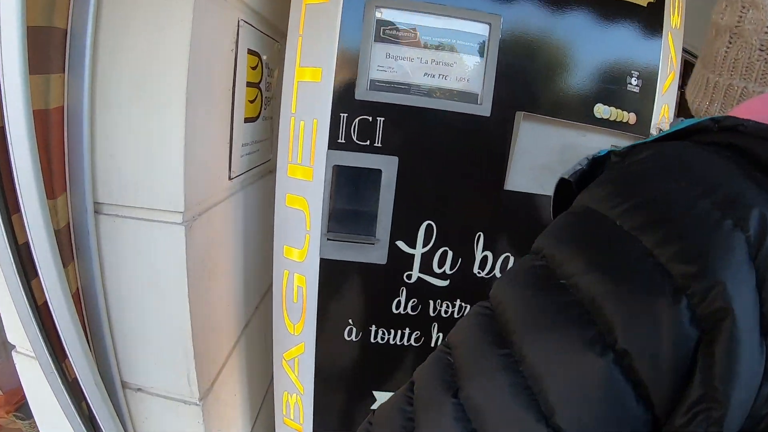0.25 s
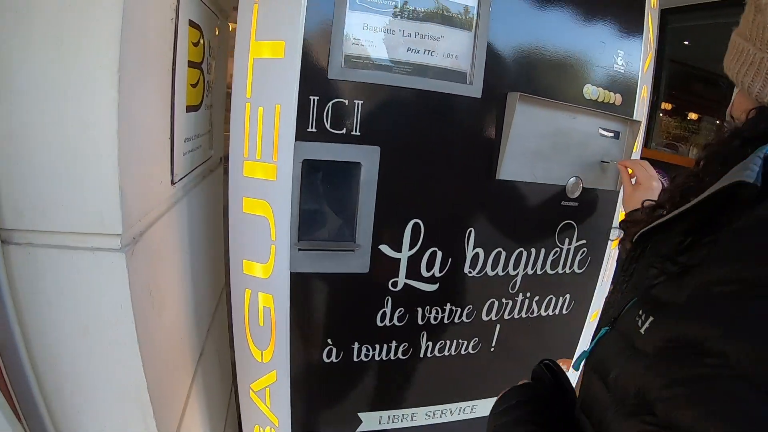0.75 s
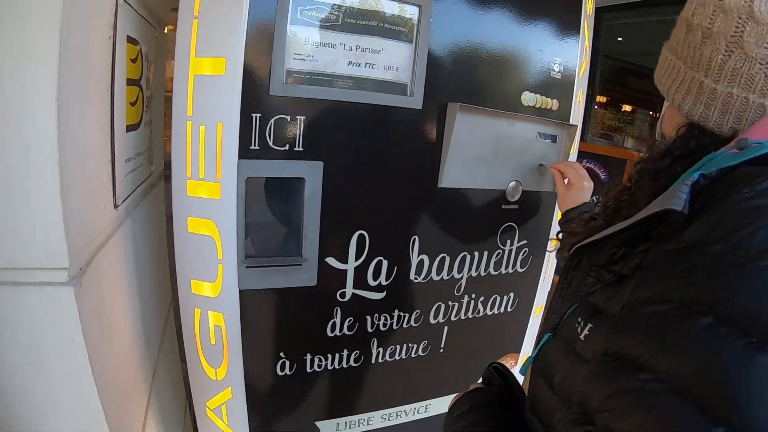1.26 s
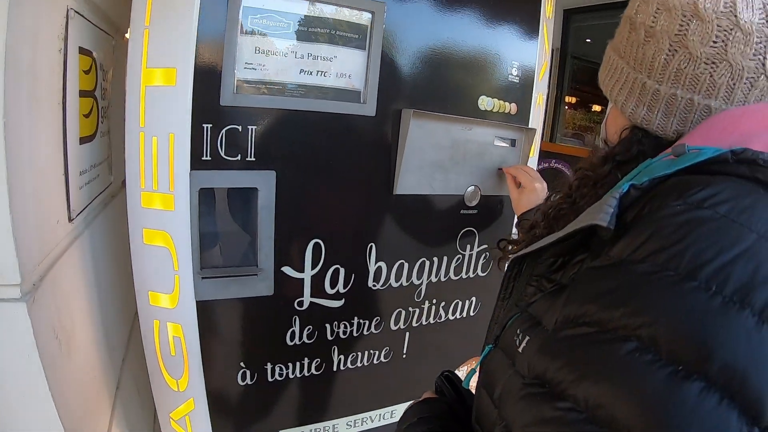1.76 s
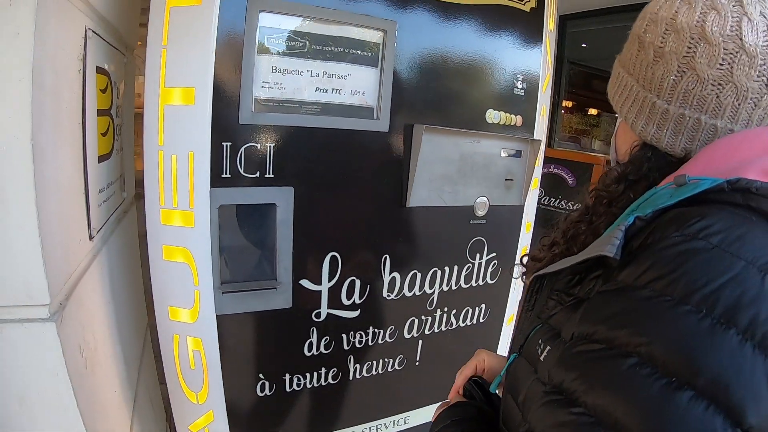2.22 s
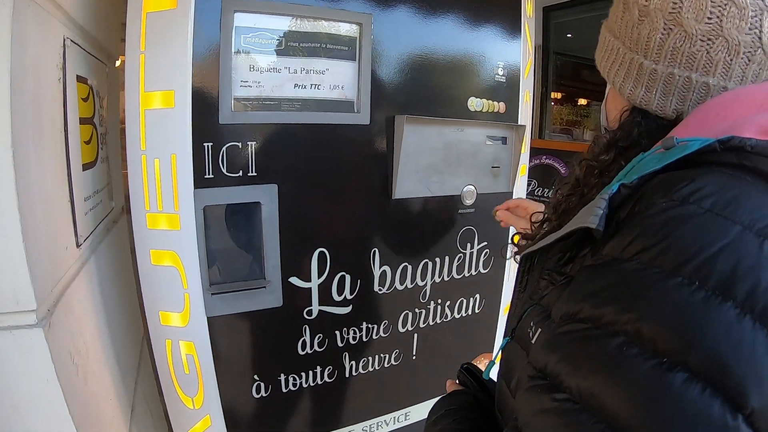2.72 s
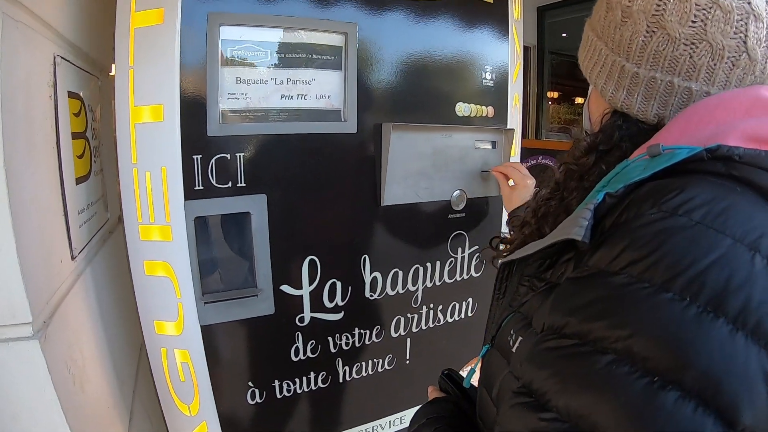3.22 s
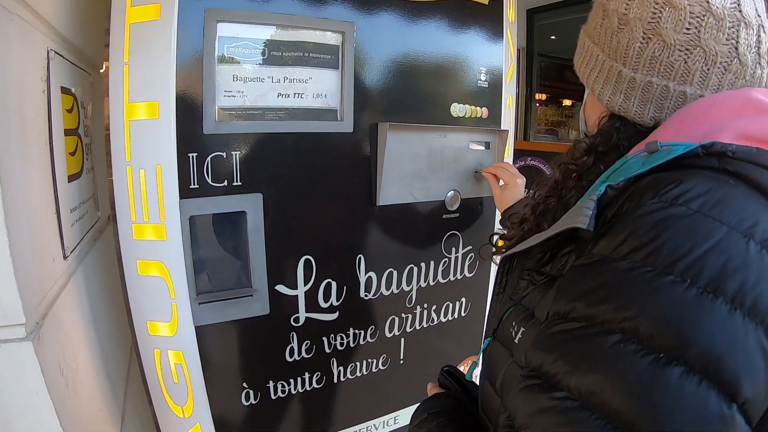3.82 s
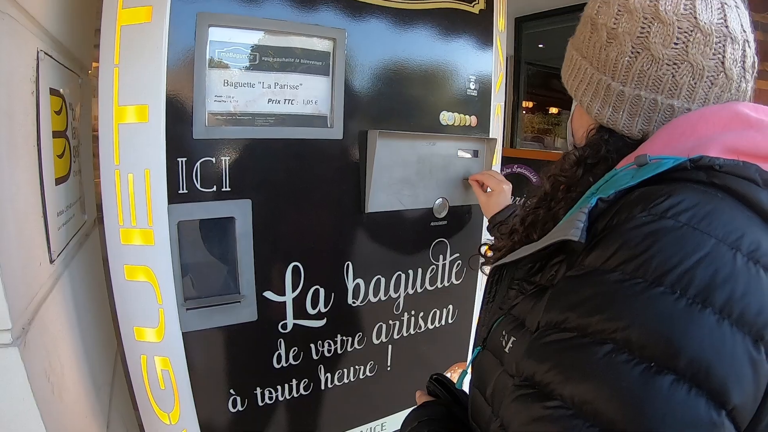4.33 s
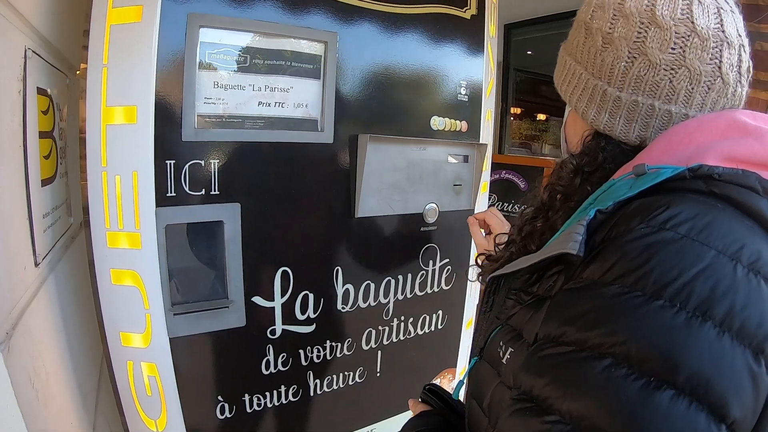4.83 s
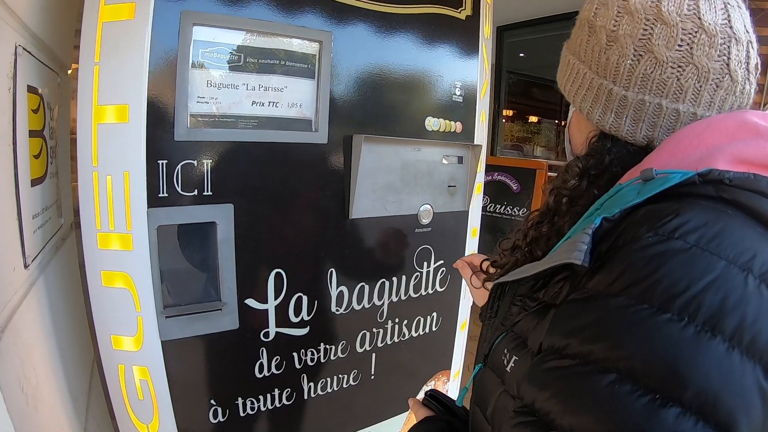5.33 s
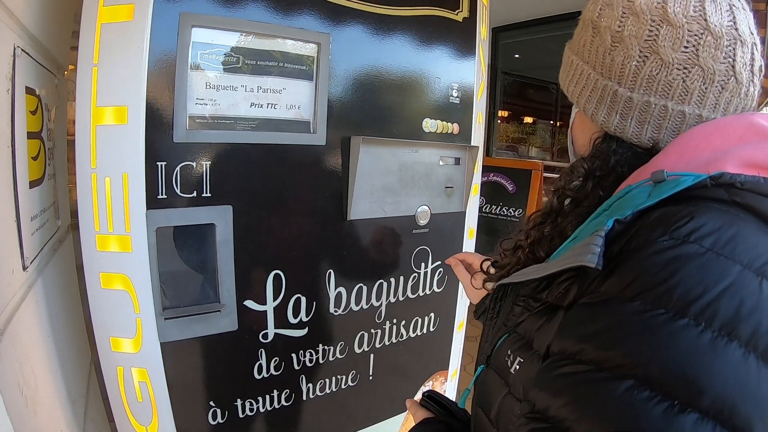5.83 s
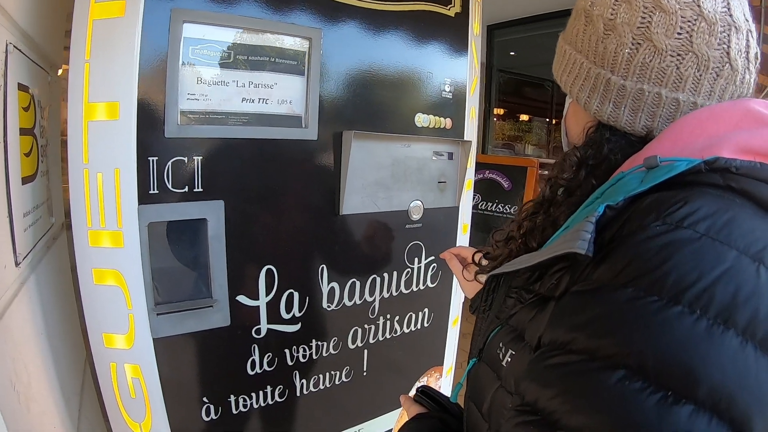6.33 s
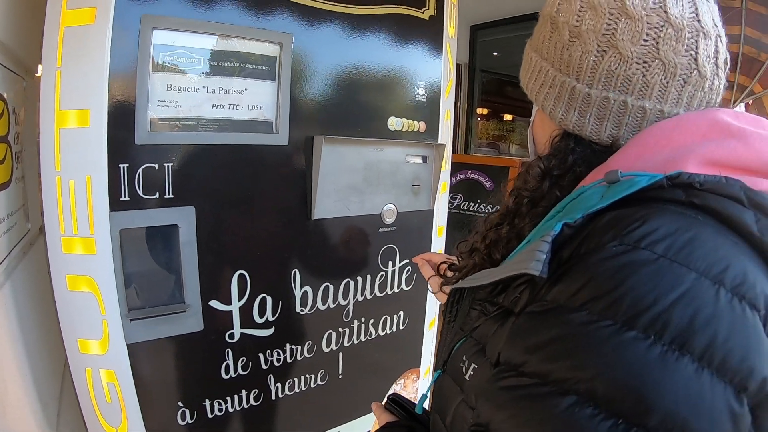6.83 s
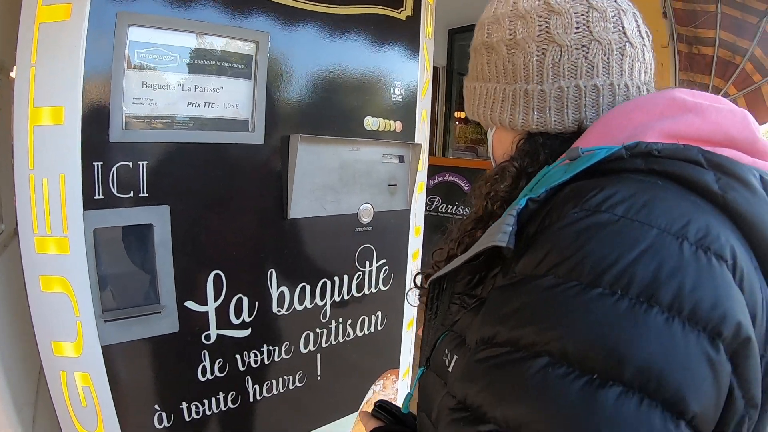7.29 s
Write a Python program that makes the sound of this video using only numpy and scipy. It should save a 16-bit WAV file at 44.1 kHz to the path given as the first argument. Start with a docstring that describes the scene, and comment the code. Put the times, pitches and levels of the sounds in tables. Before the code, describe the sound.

Outdoors, close to a steel vending machine. Strong deep wind buffeting on the microphone and a far traffic rush open the scene, easing within the first second; low rumble, faint hum, hiss and soft bass swells continue. Tiny distant birds chirp around 0.5-0.7, 1.6 and 2.4 s. Light coin handling ticks precede slot taps at 1.4 and 1.7 s, then a sharp cluster at 2.0 s with a short rattle. From 2.5 s the coin rolls down the chute, a thin high squeal peaks near 2.7 s, and a loud boxy knock lands at 3.07 s. Quieter taps come at 3.4 and 4.3 s, a firmer click at 4.55 s, then rattles and soft knocks from 4.9 to 5.8 s. A loud flap strikes at 5.92 s; a coin drops ringing at 6.09 s, clinks brightly on others at 6.19 s, and jingles to rest by about 6.8 s. A faint bird and distant motor drone remain.

```python
"""Street vending machine: two coins tap the slot, slip in and rattle down a chute; one drops and bounces on others.
Contacts are band-balanced noise clicks plus decaying modes, with a steel cabinet's echo; rolling and jingling
are dense random impacts; the thin squeal is a sagging sine with its octave.
Around it: wind on the microphone, distant traffic and deep swells (shaped noise), a low hum and a far motor
(drifting sines), and a few small birds (gliding sines)."""
import sys
import numpy as np
from scipy import signal
from scipy.fft import rfft, irfft, next_fast_len
from scipy.io import wavfile
from scipy.ndimage import uniform_filter1d, map_coordinates

SR = 44100
rng = np.random.default_rng(int(sys.argv[2]) if len(sys.argv) > 2 else 0)


def generate_wav(sig):
    """Save sig (samples, or channels by samples) to the path in sys.argv[1] as 16-bit PCM at SR."""
    pcm = np.round(np.clip(np.atleast_2d(sig).T, -1, 1) * 32767).astype(np.int16)
    wavfile.write(sys.argv[1], SR, pcm)


N = 333396
TIME = np.arange(N) / SR
LIFE = TIME[:SR * 2 // 3]  # time axis of one contact, s

# far traffic's rise and fall [t/s, rush level before trim/dB]
TRAFFIC_LEVEL = [(0, -40.5), (.4, -43), (1, -45.5), (1.5, -48.5), (2.3, -49.5), (3, -49.5), (3.7, -52.5),
                 (4.4, -50.5), (5.5, -51), (6.4, -51), (7, -49.5), (7.5, -48)]
# coins settling deep in the tube [t/s, tick/dB]
TUBE_CONTACTS = [(6.3161, -32.5), (6.326, -29.5), (6.357, -44.5), (6.3758, -38), (6.427, -41.5),
                 (6.433, -47), (6.47, -37), (6.492, -43), (6.5035, -36.5), (6.52, -44)]
# click spectrum of a coin [f/Hz, relative density/dB per Hz]
COIN_CLICK_SPECTRUM = [(400, -5), (1300, 2.5), (2200, 0.5), (3000, 7), (3900, 2.5), (4600, -9.5),
                       (6500, -3.5), (8700, 2), (10500, -3), (13000, -10), (15500, -17)]
# click spectrum of coin on coins [f/Hz, relative density/dB per Hz]
PILE_CLICK_SPECTRUM = [(400, -10), (2200, -16), (3800, 6), (4600, -3.5), (6300, 4.5), (7100, -7),
                       (8400, 10), (9100, 0.5), (10800, 1.5), (12300, -7.5), (15500, -7)]
PILE_CLICK_T60_S = 0.026


def amp(db):
    """Decibels to gain."""
    return 10 ** (np.asarray(db) / 20)


def unit(x):
    """Scale to rms 1."""
    return x / np.sqrt(np.mean(x ** 2) + 1e-20)


def along(points, hz):
    """Read (f/Hz, value) points on a log frequency axis."""
    f, v = np.transpose(points)
    return np.interp(np.log(hz + 1), np.log(f + 1), v)


def curve(rows):
    """Interpolate (t/s, value) rows to one value per sample."""
    s, values = np.transpose(rows)
    return np.interp(TIME, s, values)


def since(s):
    """Seconds elapsed since s, zero before it."""
    return np.maximum(TIME - s, 0)


def during(start_s, end_s):
    """A soft gate between two times."""
    return uniform_filter1d(1. * ((TIME > start_s) & (TIME < end_s)), size=400)


def bump(s, width_s):
    """A Gaussian rise and fall around s."""
    return np.exp(-((TIME - s) / width_s) ** 2)


def wobble(rate_hz):
    """A smooth random curve with rate_hz knots a second."""
    knots = rng.standard_normal(int(N * rate_hz / SR) + 4)
    fine = np.arange(0, len(knots), 1 / 8)
    return np.interp(TIME * rate_hz, fine, map_coordinates(knots, [fine]))


def coloured(x, spectrum):
    """Filter x by a smooth (f/Hz, gain/dB) spectrum."""
    m = next_fast_len(len(x) + 8192)
    gain = amp(along(spectrum, np.fft.rfftfreq(m, 1 / SR)))
    return irfft(rfft(x, m) * gain, m)[:len(x)]


def noise(spectrum, size=N):
    """Coloured Gaussian noise of rms 1."""
    return unit(coloured(rng.standard_normal(size), spectrum))


def dying(t60_s, t=LIFE):
    """Exponential decay, 60 dB in t60_s."""
    return np.exp(-np.log(1000) * t / t60_s)


def add(track, s, sound):
    """Mix a sound into the track at s."""
    part = track[max(round(s * SR), 0):][:len(sound)]
    part += sound[:len(part)]


def tone(hz, db):
    """A sine that drifts slowly in pitch and level."""
    level = amp(db + 2.6 * wobble(4))
    return level * np.sin(2 * np.pi * np.cumsum(hz + 1.91 * wobble(7)) / SR)


def grains(rate_hz, spread_db):
    """Impulses of random sign, size and time, rate_hz a second on average."""
    struck = rng.random(N) < rate_hz / SR
    return struck * rng.choice([-1, 1], N) * amp(spread_db * rng.standard_normal(N))


def cabinet():
    """A fresh steel-box echo: noise with frequency-dependent decay, shortest in the top treble."""
    # echo decay [f/Hz, t60/s]
    echo_t60 = [(500, 0.45), (3500, 0.57), (8000, 0.44), (14000, 0.28)]
    # echo colour [f/Hz, gain/dB]
    echo_colour = [(300, -1), (600, 3), (1000, -1), (1600, 1.5), (2300, -3), (3100, -2), (3850, 1.5),
                   (4550, 2.5), (5200, 0), (6200, -1.5), (7200, -4.5), (8500, -9.5), (11000, -6),
                   (15000, 0)]
    hz, t, z = signal.stft(rng.standard_normal(len(LIFE)), SR, nperseg=256)
    decay = dying(along(echo_t60, hz)[:, None], t)
    tail = signal.istft(z * decay, SR, nperseg=256)[1]
    return coloured(tail / np.linalg.norm(tail), echo_colour)


def strikes(rows, modes, click, click_t60_s, rise_s, ring_db, echo_db):
    """A contact excites a noise click and ringing modes; each row sets its clack, thud, tick and echo."""
    # clack, thud and tick bands [low f/Hz, high f/Hz]
    bands_hz = [(2000, 5500), (260, 2000), (5500, 16000)]
    track = np.zeros(N)
    for s, *levels_db, wet_db in rows:
        ring = np.zeros(len(LIFE))
        for hz, db, t60_s in modes:
            sine = np.sin(2 * np.pi * (hz * LIFE + rng.random()))
            ring += amp(db + rng.normal(0, 0.5)) * dying(t60_s) * sine
        burst = noise(click, size=len(LIFE)) * dying(click_t60_s)
        blow = (burst + amp(ring_db) * ring) * (1 - np.exp(-LIFE / rise_s))
        hit = np.zeros(len(LIFE))
        for edges_hz, db in zip(bands_hz, levels_db):
            sos = signal.butter(N=3, Wn=edges_hz, btype="band", fs=SR, output="sos")
            part = signal.sosfilt(sos, blow)
            peak_rms = np.sqrt(uniform_filter1d(part ** 2, size=88).max())  # 2 ms window
            hit += amp(db) * part / peak_rms
        add(track, s, hit)
        shake = hit * dying(0.026)  # the blow itself shakes the box
        add(track, s, amp(wet_db + echo_db) * signal.fftconvolve(shake, cabinet()))
    return track


def wind():
    """Wind buffets the microphone: deep noise with a moving level."""
    # wind level [t/s, level/dB]
    wind_level = [(0, -7.5), (.7, -22.5), (1.2, -22), (3.2, -23), (3.7, -20.5), (4.3, -30), (5.6, -24),
                  (6.6, -27.5), (7.5, -19.5)]
    # buffeting spectrum [f/Hz, relative density/dB per Hz]
    buffet = [(1, -10), (4, -1), (8, 1.5), (14, -17.5), (22, -21.5), (30, -24), (40, -22.5), (58, -30.5),
              (90, -36.5), (150, -73), (300, -94)]
    return amp(curve(wind_level)) * noise(buffet)


def rumble(level_db=-47.5, follows=0.38):
    """Low noise that partly follows the traffic's rise and fall in dB."""
    # rumble spectrum [f/Hz, relative density/dB per Hz]
    rumble_spectrum = [(40, -18), (70, -0.5), (100, -6), (135, -3), (170, -7), (215, -6), (275, -8),
                       (340, -7.5), (450, -14.5), (800, -59.5)]
    traffic_db = curve(TRAFFIC_LEVEL)
    change_db = follows * (traffic_db - traffic_db.mean())
    return amp(level_db + change_db + 0.95 * wobble(18)) * noise(rumble_spectrum)


def traffic_rush(trim_db=1):
    """Far traffic: broadband noise with a moving, slightly unsteady level."""
    # rush spectrum [f/Hz, relative density/dB per Hz]
    rush_spectrum = [(180, -5), (290, -1), (390, -8.5), (480, -4.5), (660, -3.5), (900, -4.5), (1450, -5.5),
                     (1900, -9), (2200, -15.5), (3070, -18), (3630, -14.5), (5150, -27), (9000, -40.5),
                     (15900, -92)]
    return amp(curve(TRAFFIC_LEVEL) + trim_db + 0.2 * wobble(3.3)) * noise(rush_spectrum)


def hiss():
    """The microphone's own floor: steady bright noise."""
    return amp(-63.5) * noise([(3000, 2.5), (15000, -8.5)])


def hum():
    """The machine's unsteady hum: low sines drifting independently."""
    # hum lines [f/Hz, level/dB]
    hum_lines = [(47.6, -50), (95, -55.5), (151, -53), (252, -56), (280, -64.5)]
    return sum(tone(hz, db) for hz, db in hum_lines)


def swells(skirt_db_per_octave=17.5):
    """Each bass swell is a passing band of deep noise."""
    # swells [crest t/s, half width/s, centre f/Hz, level/dB]
    swell_rows = [(.22, 0.065, 80, -39.5), (.42, 0.077, 76, -37.5), (.72, .07, 81, -40),
                  (1.04, .12, 98, -46.5), (1.55, 0.1, 134, -40.5), (1.93, 0.32, 95, -43.5),
                  (3.0, 0.33, 123, -46.5), (3.74, 0.14, 105, -44.5), (5.07, 0.28, 112, -48),
                  (6.15, 0.38, 84.5, -47), (7.25, 0.059, 139, -39.5), (7.42, 0.086, 81, -39)]
    skirt_db = -2 * skirt_db_per_octave  # two octaves out
    track = np.zeros(N)
    for s, width_s, hz, db in swell_rows:
        band = [(hz / 4, skirt_db), (hz, 0), (hz * 4, skirt_db), (hz * 16, -120)]
        track += amp(db) * bump(s, width_s) * noise(band)
    return track


def handling(t60_s=0.08):
    """Coins touch between the fingers, too damped to ring: decaying noise."""
    # handling ticks [t/s, level/dB]
    tick_rows = [(0.35, -53), (0.687, -51), (1.029, -52), (1.255, -53.5), (1.596, -51), (2.264, -57),
                 (2.956, -46.5), (4.068, -54), (4.891, -41), (4.9, -46.5), (5.86, -46)]
    track = np.zeros(N)
    for s, db in tick_rows:
        add(track, s, amp(db) * noise(COIN_CLICK_SPECTRUM, size=len(LIFE)) * dying(t60_s))
    return track


def birds(echo_db=-1, trim_db=8.0):
    """Far birds slur gliding sines with random pitch waver; the street smears them."""
    # notes [t/s, length/s, start f/Hz, end f/Hz, waver/Hz, level before trim/dB]
    notes = [(0.501, 0.043, 7470, 4880, 300, -56), (0.586, 0.06, 6500, 5700, 452, -56),
             (0.689, 0.082, 6350, 4920, 400, -57), (1.533, 0.045, 6530, 4840, 300, -59.5),
             (1.615, .06, 6500, 5420, 350, -60.5), (2.337, 0.042, 6330, 5180, 300, -61.5),
             (2.35, 0.19, 10140, 10850, 200, -71.5), (2.414, 0.069, 6200, 5000, 250, -64),
             (6.629, .16, 4470, 3360, 110, -57.5)]
    song = np.zeros(N)
    for s, length_s, start_hz, end_hz, waver_hz, db in notes:
        u = np.linspace(0, 1, int(length_s * SR))
        glide_hz = end_hz + (start_hz - end_hz) * (1 - u) ** 1.4
        hz = glide_hz + waver_hz * wobble(1200)[:len(u)]
        envelope = np.sqrt(np.abs(np.sin(np.pi * u)))
        add(song, s, amp(db + trim_db) * envelope * np.sin(2 * np.pi * np.cumsum(hz) / SR))
    walls = rng.standard_normal(len(LIFE)) * dying(0.51)
    return song + amp(echo_db) * signal.fftconvolve(song, walls / np.linalg.norm(walls))[:N]


def slot_taps():
    """A coin taps the slot plate, which clicks and rings."""
    # taps [t/s, clack/dB, thud/dB, tick/dB, echo before trim/dB]
    taps = [(1.361, -43.5, -54, -60, -21), (1.722, -33, -67, -33, -21), (1.7415, -40.5, -65, -37, -6.5),
            (1.9795, -30, -55, -43, -11), (1.9855, -29, -43, -32.5, -10.5), (1.991, -29, -33.5, -36.5, -8),
            (3.3765, -40.5, -63, -55, -14.5), (4.3185, -47.5, -63, -44, -7), (4.3625, -56, -61, -54, -12),
            (4.5385, -34, -55, -36, -3), (4.549, -34, -38, -37.5, -6)]
    # plate modes [f/Hz, relative level/dB, t60/s]
    modes = [(3596, -3, .28), (3740, 2, .1), (3870, -3, .12), (4115, -7, .18), (4975, -1, .11),
             (5090, -7, .07), (7036, -8, .16), (7800, -11, .12), (8420, -11, .14), (8780, -10, .17),
             (9390, -6, .07), (9950, -10, .06)]
    # plate click [f/Hz, relative density/dB per Hz]
    click = [(400, -15), (2000, -2), (3000, -1), (3800, 12), (4500, -6.5), (5000, 0), (5800, -7.5),
             (7500, -7), (9600, -8.5), (11500, -14.5), (12800, -19), (15200, -22)]
    return strikes(taps, modes, click, click_t60_s=0.038, rise_s=0.00053, ring_db=-13, echo_db=14.0)


def rolling(rate_hz=500, spread_db=4):
    """A milled rim chatters down the chute: dense small impacts, smeared by the cabinet."""
    # runs [t/s, length/s, rattle/dB, hard edge contact/dB], levels before the speed envelope
    runs = [(2.011, 0.14, -38, -43.5), (2.484, 0.2, -45, -45), (2.68, 0.17, -43, -52),
            (2.865, 0.065, -38.5, -45.5), (4.556, 0.03, -41.5, -41), (4.622, 0.07, -42.5, -50.5),
            (4.938, .065, -46.5, -46), (5.08, 0.028, -43.5, -49.5), (5.223, 0.089, -50, -58),
            (5.708, 0.27, -46, -55)]
    # chute resonances [f/Hz, gain/dB]
    chute = [(240, -13), (400, -5.5), (496, 0), (562, -24), (993, -0.5), (1290, -14), (1580, -5),
             (2390, -7.5), (3680, -1.5), (4500, -6), (5940, -17), (8600, -19), (15900, -53)]
    attack_s, slowing_db_per_s, release_t60_s = 0.0049, 24, 0.43
    rattle, edge = np.zeros(N), np.zeros(N)
    for s, length_s, rattle_db, edge_db in runs:
        pickup = 1 - np.exp(-since(s) / attack_s)
        slowing = amp(-slowing_db_per_s * since(s))
        speed = pickup * slowing * dying(release_t60_s, since(s + length_s))
        rattle += amp(rattle_db) * speed
        edge += amp(edge_db) * speed
    impacts = grains(rate_hz, spread_db)
    chatter = coloured(impacts + 5.7 * signal.fftconvolve(impacts, cabinet())[:N], chute)
    sos = signal.butter(N=3, Wn=6000, btype="high", fs=SR, output="sos")
    bright = signal.sosfilt(sos, chatter)
    return rattle * unit(chatter) + edge * unit(bright)


def squeal(octave_db=-33, flutter_db=5.0, flutter_hz=26, waver_db=2.7):
    """A nearly pure squeal swells, then flutters and fades to a thread, its pitch sagging throughout."""
    start_s, crest_s, end_s = 2.51, 2.723, 3.06
    crest_db, thread_db, rise_db_per_s, fall_db_per_s = -34, -72, 196, 109  # levels before flutter
    crest_hz, sag_hz_per_s = 5815, 230
    t = TIME - crest_s
    swell = amp(crest_db + np.minimum(rise_db_per_s * t, -fall_db_per_s * t))
    beat_db = flutter_db * np.cos(2 * np.pi * flutter_hz * since(crest_s))
    flutter = amp(beat_db + waver_db * wobble(62))
    level = (swell + amp(thread_db)) * flutter * during(start_s, end_s)
    phase = 2 * np.pi * np.cumsum(crest_hz - sag_hz_per_s * t + 10 * wobble(73)) / SR
    return np.sqrt(2) * level * (np.sin(phase) + amp(octave_db) * np.sin(2 * phase))


def gate_knocks():
    """Levers and gates knock inside the cabinet, softer in onset than the slot."""
    # knocks [t/s, clack/dB, thud/dB, tick/dB, echo before trim/dB]
    knocks = [(2.573, -45.5, -54, -49, 5.5), (2.639, -42, -38, -71, -3), (2.694, -52.5, -42.5, -55, 9),
              (2.866, -40, -37, -49, -20), (2.881, -60, -36, -48, 0), (2.888, -32, -38, -47, -6.5),
              (3.0628, -21.5, -30, -23, -6), (3.066, -30, -24.5, -24.5, -21),
              (3.071, -23, -22.5, -32, -7.5), (3.092, -33, -40, -33, 1), (3.208, -46, -42, -43.5, -11),
              (3.2805, -41.5, -49, -55, -9), (4.937, -42, -39, -50, -26), (4.982, -40, -43, -48.5, 1.5),
              (5.085, -43, -36, -55, -22), (5.2, -48.5, -47, -62, 5.5), (5.488, -54, -63, -62, 8.5),
              (5.7523, -42.5, -39.5, -61, -2)]
    # gate modes [f/Hz, relative level/dB, t60/s]
    modes = [(510, -8, 0.313), (790, -4, 0.087), (1232, 11.5, 0.037), (1293, 0, 0.076), (1660, -17, 0.18),
             (2304, -9, 0.3), (2579, -5.5, .44), (2990, 6, 0.2), (3340, -3, 0.17), (3450, 2.5, 0.15),
             (4590, -2.5, 0.096), (6140, -9, 0.097), (7020, -15.5, 0.22), (8140, -7, 0.22)]
    # gate click [f/Hz, relative density/dB per Hz]
    click = [(300, 1), (1200, 2), (2200, 3.5), (3200, 4), (4000, -0.5), (5200, -14), (6000, -3),
             (7500, -10), (8700, -5), (11000, -9.5), (15500, -24)]
    return strikes(knocks, modes, click, click_t60_s=0.024, rise_s=0.0014, ring_db=-22.5, echo_db=11.0)


def sorting_flap():
    """The sorting flap strikes and rings."""
    # flap contacts [t/s, clack/dB, thud/dB, tick/dB, echo before trim/dB]
    flaps = [(5.9213, -20, -27.5, -20.5, -8.5), (5.96, -26.5, -47, -30, -30),
             (5.9635, -29, -29.5, -21.5, -20), (6.01, -42, -34.5, -38, -8.5)]
    # flap modes [f/Hz, relative level/dB, t60/s]
    modes = [(728, -7.5, 0.28), (1168, 4.5, 0.04), (1613, -4.5, 0.45), (2020, -5, .2), (3130, 0, 0.15),
             (3484, -8, 0.34), (3962, -4, 0.4), (4996, -10, 0.22), (6150, -20, 0.44), (7550, -7, 0.12),
             (8400, -15, 0.3), (8624, -3.5, .2)]
    # flap click [f/Hz, relative density/dB per Hz]
    click = [(400, 1), (1100, -15), (2400, -5), (3200, 7.5), (3700, 15), (4300, -7), (5800, -15),
             (8300, -1), (10900, -5), (12500, -9), (15500, -22)]
    return strikes(flaps, modes, click, click_t60_s=0.02, rise_s=0.00049, ring_db=-22, echo_db=14.0)


def coin_fall():
    """A coin falls and rings freely, with a sharp onset."""
    # drop contacts [t/s, clack/dB, thud/dB, tick/dB, echo before trim/dB]
    drops = [(6.0852, -35, -31.5, -22.5, -6), (6.0905, -25.5, -29.5, -20, -3.5),
             (6.1245, -23.5, -37.5, -34, -6)]
    # coin modes [f/Hz, relative level/dB, t60/s]
    modes = [(2875, -4, .3), (3690, -9, .35), (3750, -8, .35), (3820, -9, .3), (9290, -5, .22),
             (11789, 3, .29), (14155, -5, .26), (15438, -18, .35)]
    return strikes(drops, modes, COIN_CLICK_SPECTRUM, click_t60_s=0.022, rise_s=0.0002,
                   ring_db=-14.5, echo_db=10.5)


def pile_clinks():
    """The coin lands on the pile and bounces once, exciting the piled coins' modes."""
    # clinks [t/s, clack/dB, thud/dB, tick/dB, echo before trim/dB]
    clinks = [(6.1850, -25.5, -33.5, -13.5, -19.5), (6.2215, -32, -32, -26.5, -12.5)]
    # pile modes [f/Hz, relative level/dB, t60/s]
    modes = [(3900, -7, 0.2), (6363, -24, 0.18), (7838, 2, 0.023), (8430, 19.5, 0.022), (8390, -12, 0.16),
             (8300, 0, .03), (8550, -7.5, 0.16), (15420, -22.5, 0.27)]
    return strikes(clinks, modes, PILE_CLICK_SPECTRUM, click_t60_s=PILE_CLICK_T60_S, rise_s=0.0004,
                   ring_db=-11.5, echo_db=16.5)


def tube_settling(clack_db=-6.5, thud_db=-15.5):
    """Coins slide and settle deep in the tube: light contacts, nearly all tick."""
    # tube modes [f/Hz, relative level/dB, t60/s]
    modes = [(4000, 6, .15), (5280, -4.5, 0.28), (5930, -10, 0.23), (5860, -6, 0.11), (6380, 4.5, 0.145),
             (8300, 0.5, 0.088), (9230, -14, .17), (10500, 2, .12), (13000, -9, .15), (15420, -16, .2)]
    rows = [(s, db + clack_db, db + thud_db, db, 0) for s, db in TUBE_CONTACTS]
    return strikes(rows, modes, PILE_CLICK_SPECTRUM, click_t60_s=PILE_CLICK_T60_S, rise_s=0.0016,
                   ring_db=-22, echo_db=2)


def jostling(rate_hz=900, spread_db=4, stir_db=-21, t60_s=0.35):
    """Each tube contact stirs loose coins, which jingle against each other and come to rest."""
    # jingle spectrum [f/Hz, relative density/dB per Hz]
    jingle = [(2000, -25), (3900, -5), (4700, -2), (5400, 4.5), (6300, 7.5), (7200, -10.5), (8500, -5),
              (9300, -9), (10500, -12), (12300, -18), (15500, -17)]
    power = np.zeros(N)
    for s, tick_db in TUBE_CONTACTS:
        power += (amp(tick_db + stir_db) * (TIME > s) * dying(t60_s, since(s))) ** 2
    return np.sqrt(power) * unit(coloured(grains(rate_hz, spread_db), jingle))


def far_motor():
    """A far motor comes and goes on one slightly drifting pitch."""
    # motor swells [crest t/s, half width/s, level/dB]
    motor_rows = [(6.1, 0.23, -47.5), (6.8, 0.12, -49.5), (7.28, 0.2, -47.5)]
    level = sum(amp(db) * bump(s, width_s) for s, width_s, db in motor_rows)
    return level * tone(380, 0)


def scene():
    """Everything at one microphone."""
    street = wind() + rumble() + traffic_rush() + hiss() + hum() + swells() + far_motor() + birds()
    strikes_inside = gate_knocks() + sorting_flap() + coin_fall() + pile_clinks() + tube_settling()
    coins = handling() + slot_taps() + rolling() + squeal() + jostling()
    return (street + strikes_inside + coins)[None]


def record(dry):
    """Cut everything from 15.8 kHz up."""
    m = next_fast_len(N + SR)
    return irfft(rfft(dry, m) * (np.fft.rfftfreq(m, 1 / SR) < 15800), m)[..., :N]


dry = scene()
out = record(dry)
generate_wav(out)
```